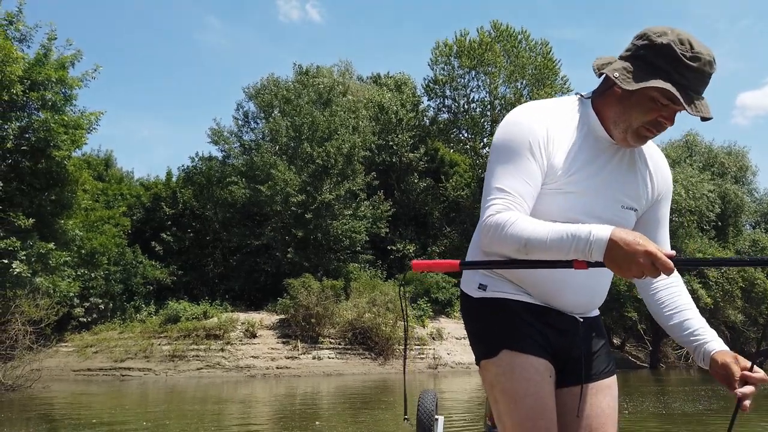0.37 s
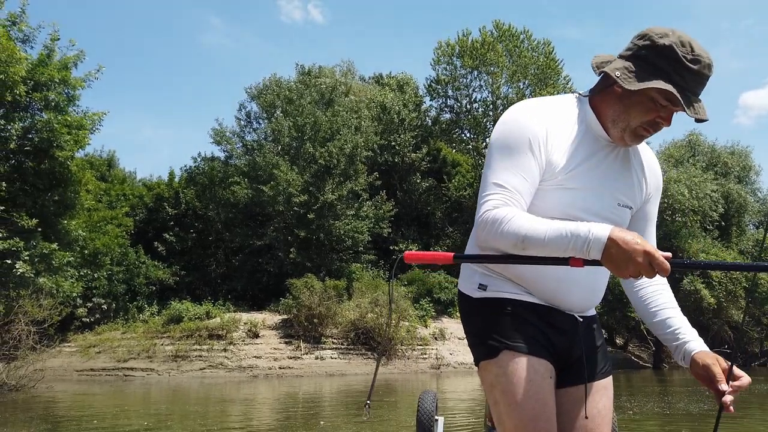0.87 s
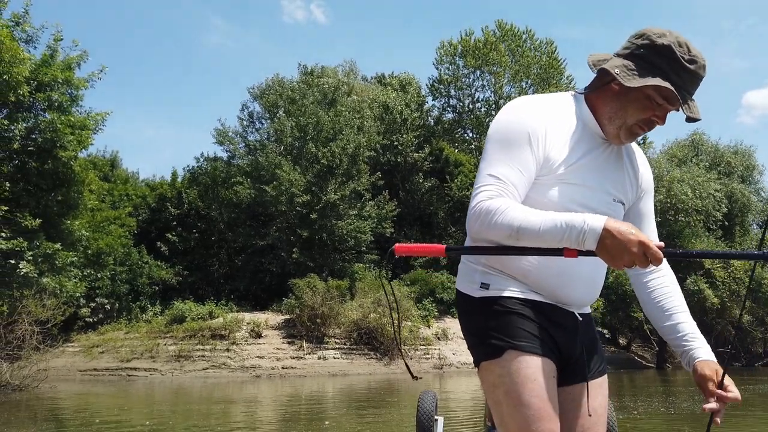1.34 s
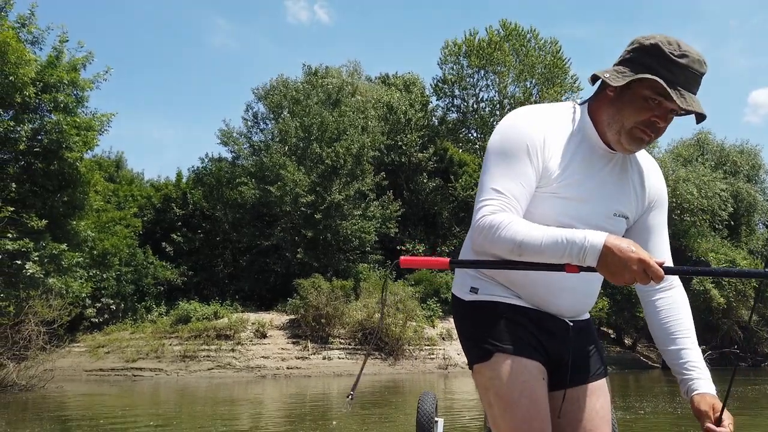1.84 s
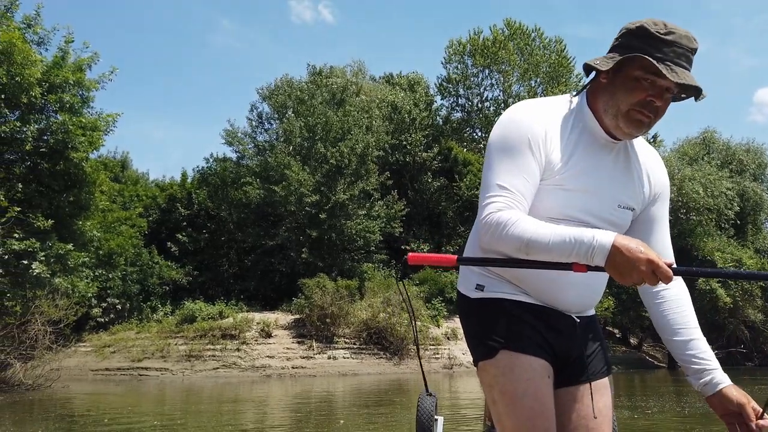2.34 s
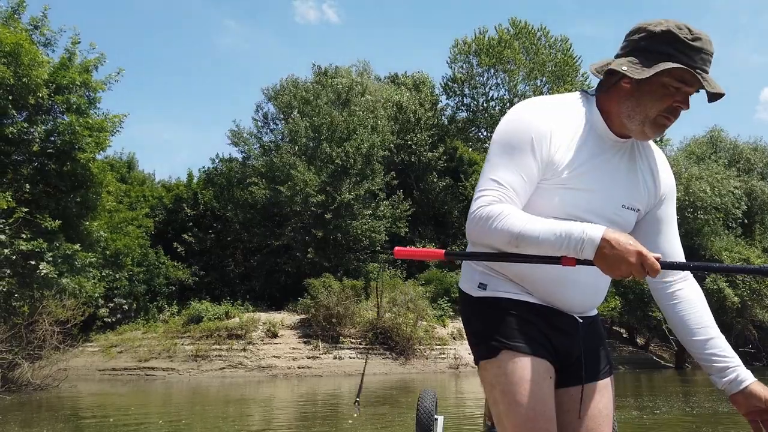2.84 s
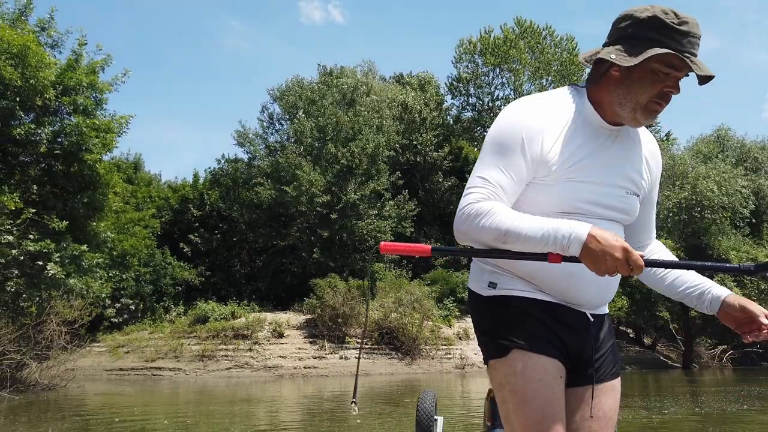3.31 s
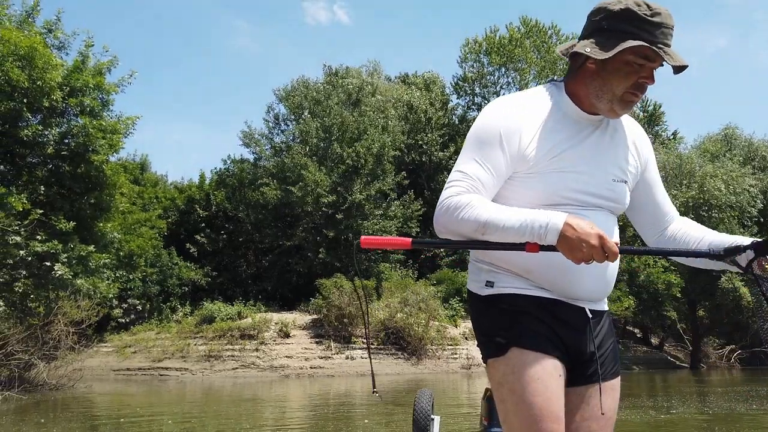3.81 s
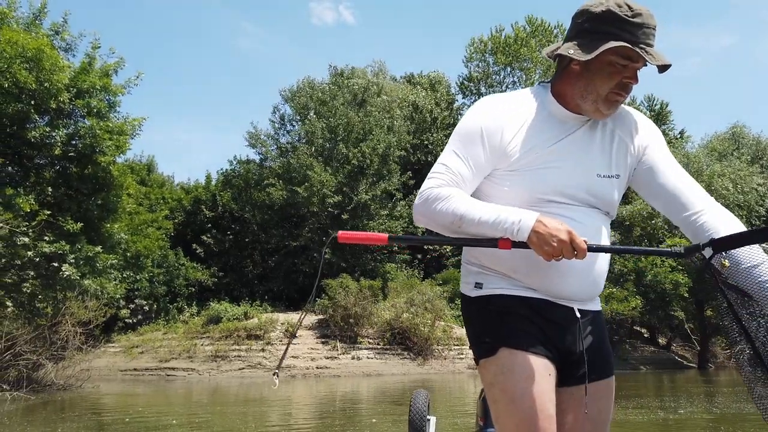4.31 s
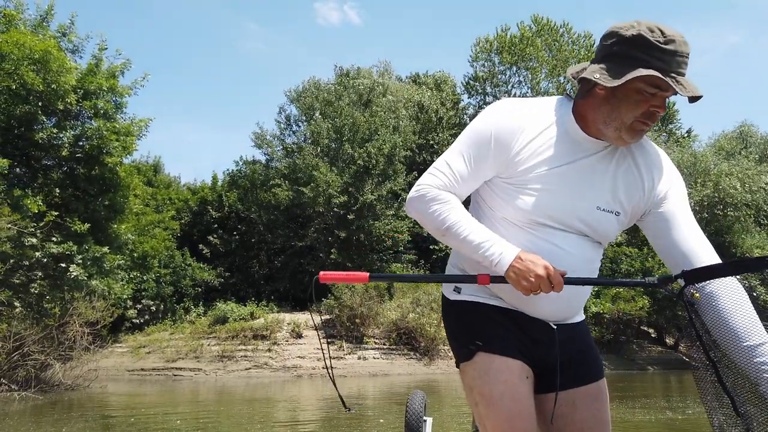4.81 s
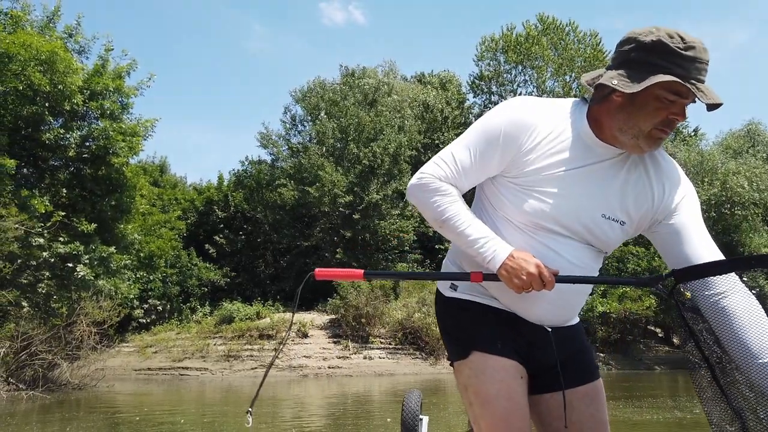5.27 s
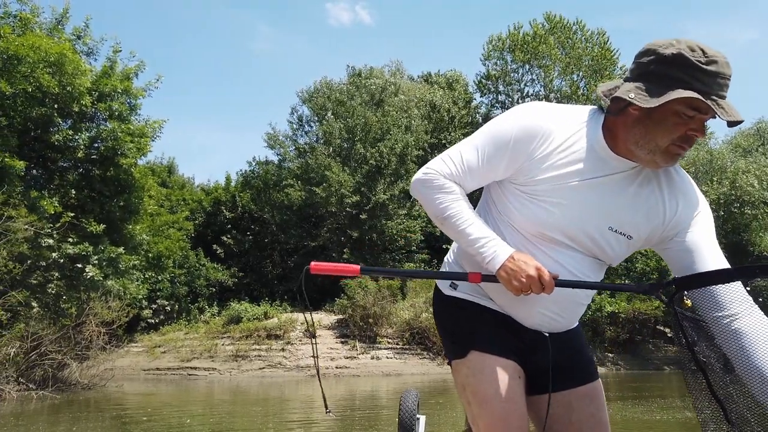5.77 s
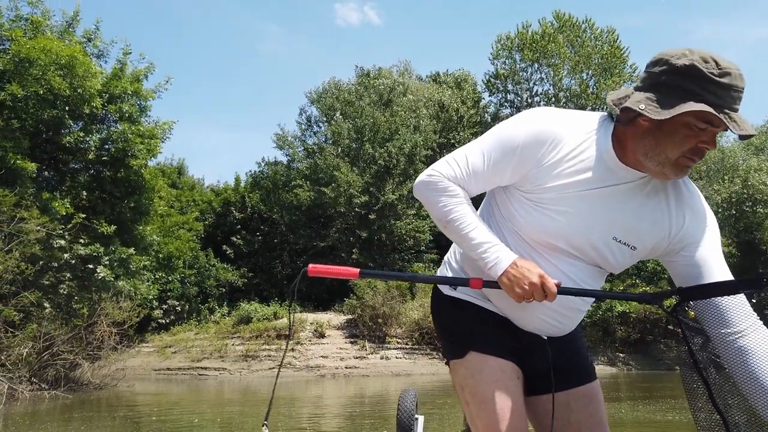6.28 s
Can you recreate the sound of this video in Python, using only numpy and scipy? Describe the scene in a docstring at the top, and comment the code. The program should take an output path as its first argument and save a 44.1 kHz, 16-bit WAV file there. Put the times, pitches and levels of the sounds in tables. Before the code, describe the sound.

Close to the microphone, gear is shifted in a small boat: low, boomy thumps, hollow knocks, ticks and small scrapes come in clusters, with a faint wet net rustle. Far birds chirp dimly behind a very quiet river hush. The handling then eases, and a finch on the wooded bank sings growing paired notes, a quick trill and a tumbling flourish, echoing softly among trees. One low bump interrupts before the song ends.

```python
"""A faint river hush and the rustle of a net in a small boat, soon joined by dull thumps and knocks of shifted gear.
Blows reach the microphone through the hull as low cycles and ringing panels; a loose fitting ticks and scrapes.
Weight shifts and dragged gear are slow swells of low noise; net and hush are shaped, patchy stereo noise.
Far birds call as gliding sines, mostly echo; on the wooded bank a finch sings growing pairs, a trill and a
falling flourish, its gliding, buzzing sines scattered by the trees."""
import sys
import numpy as np
from scipy import signal
from scipy.fft import rfft, irfft, next_fast_len
from scipy.io import wavfile
from scipy.ndimage import uniform_filter1d, map_coordinates

SR = 44100
rng = np.random.default_rng(int(sys.argv[2]) if len(sys.argv) > 2 else 0)


def generate_wav(sig):
    """Save sig (samples, or channels by samples) to the path in sys.argv[1] as 16-bit PCM at SR."""
    pcm = np.round(np.clip(np.atleast_2d(sig).T, -1, 1) * 32767).astype(np.int16)
    wavfile.write(sys.argv[1], SR, pcm)


def gain_from_db(level_db):
    """Turn a decibel level (scalar or array-like) into a linear amplitude factor."""
    decades = np.asarray(level_db, float) / 20
    return 10 ** decades


N = 292846  # samples in the scene


def unit(x):
    """Scaled to rms 1."""
    return x / np.sqrt(np.mean(x ** 2) + 1e-20)


def along(points, hz):
    """Values of (Hz, value) points, joined on a log frequency axis."""
    f, v = np.transpose(points)
    return np.interp(np.log(hz + 1), np.log(f + 1), v)


def curves(rows):
    """One value per sample for each column after the time."""
    s, *cols = np.transpose(rows)
    return [np.interp(np.arange(N) / SR, s, c) for c in cols]


def wobble(rate):
    """A smooth random curve, rate knots a second, 400 at most."""
    knots = rng.standard_normal(N // 100)
    return map_coordinates(knots, [np.arange(N) * min(rate, 400) / SR])


def filtered(x, response):
    """x times a complex response of frequency."""
    m = next_fast_len(N + SR // 2)
    return irfft(rfft(x, m) * response(np.fft.rfftfreq(m, 1 / SR)), m)[..., :N]


def ringing(x, modes):
    """x through parallel (Hz, width Hz, dB) resonances of alternating sign."""
    def response(f):
        return sum((-1) ** k * gain_from_db(db) * 1j * f * width / (hz * hz - f * f + 1j * f * width)
                   for k, (hz, width, db) in enumerate(modes))
    return filtered(x, response)


def rush(spectrum, alike, patchy_db=0):
    """Stereo noise of rms 1 with patches of random gain; alike sets the left-right likeness by frequency."""
    z = signal.stft(rng.standard_normal((2, N)), nperseg=512)[2]
    field = uniform_filter1d(rng.standard_normal(z.shape[1:]), size=3, axis=0)
    field = uniform_filter1d(field, size=8, axis=1)
    pair = signal.istft(z * gain_from_db(patchy_db * unit(field)), nperseg=512)[1][:, :N]

    def response(hz):
        turn = np.arccos(np.clip(along(alike, hz), -1, 1)) / 2
        return gain_from_db(along(spectrum, hz)) * [np.cos(turn), np.sin(turn)]
    mid, side = filtered(pair, response)
    return unit(np.array([mid + side, mid - side]))


def add(track, s, sound):
    """Mixes a sound into the track at time s."""
    track[round(s * SR):][:len(sound)] += sound


def swell(t, time):
    """Rises to 1 at the given time, 1 ms at the least, and dies away."""
    u = t / max(time, .001)
    return u * np.exp(1 - u)


def river_hush():
    """River and leaves: steady, faintly patchy noise that slowly sinks."""
    # hush level before its slow wander: (time [s], level [dB])
    hush_level = [(0, -72), (2.5, -73), (4.5, -73.5), (6.64, -76.5)]
    # hush spectrum: (frequency [Hz], relative density [dB per Hz])
    hush_spectrum = [(100, -20), (150, -6), (220, -18), (400, -21), (1000, -25), (1800, -24), (2900, -22),
                     (4500, -27), (6000, -34), (8000, -37), (12700, -39), (12900, -62)]
    # how alike both microphone ports hear it: (frequency [Hz], left-right likeness [0..1])
    likeness = [(60, 0.75), (180, 0.81), (550, 0.32), (1650, 0.12), (4970, 0.12), (15000, 0.17)]
    level_db, = curves(hush_level)
    return gain_from_db(level_db + 0.6 * wobble(2.86)) * rush(hush_spectrum, likeness, patchy_db=2.3)


def handling():
    """Weight shifts sway the boat and gear drags over its floor in lumps."""
    # how hard weight and gear are shifted, before lumps: (time [s], drag level [dB])
    effort = [(0, -60), (.45, -64), (.7, -47), (.87, -58), (1.15, -69.5), (1.4, -63), (1.9, -68),
              (2.1, -45), (2.35, -51), (2.7, -59.5), (2.85, -72), (3.2, -74.5), (3.45, -45), (3.82, -75),
              (4.8, -78), (4.9, -55.5), (5.05, -77.5), (6.64, -75)]
    # swaying boat: (frequency [Hz], relative density [dB per Hz])
    sway_spectrum = [(20, 3.5), (50, 6.5), (95, 0), (150, -50), (300, -120)]
    # dragged gear: (frequency [Hz], relative density [dB per Hz])
    drag_spectrum = [(50, -28.5), (80, 3.5), (170, -3), (300, -24.5), (900, -40), (2000, -120)]
    drag_db, = curves(effort)
    # mean sway -61.5 dB before its wander; it follows the drag by 0.53 dB per dB
    sway_db = -61.5 + 0.53 * (drag_db - drag_db.mean())
    sway = gain_from_db(sway_db + 2.2 * wobble(7.2)) * rush(sway_spectrum, [(50, 0.95)])
    drag = gain_from_db(drag_db + 2.2 * wobble(12)) * rush(drag_spectrum, [(150, 1.0)], patchy_db=1.0)
    return sway + drag


def net():
    """Wet mesh slides in strokes that start fast and fade, crackling unevenly."""
    # strokes of the net before the crackle: (time [s], length [s], rustle level [dB])
    strokes = [(0, 0.053, -74.5), (0.176, 0.28, -77.5), (0.341, 0.16, -70), (0.552, 0.2, -86),
               (1.045, 0.14, -85), (1.253, 0.26, -83.5), (2.05, 0.31, -73.5), (3.443, 0.19, -82),
               (4.718, 0.59, -80)]
    # rustling mesh: (frequency [Hz], relative density [dB per Hz])
    mesh_spectrum = [(4000, -25), (6500, -12), (9000, -4), (11500, 0), (15600, -5), (15750, -60)]
    stroke = np.zeros(N + SR)
    for s, length, db in strokes:
        u = np.linspace(0, 1, round(length * SR))
        add(stroke, s, gain_from_db(db) * np.sin(np.pi * u ** 0.5))
    swish = rush(mesh_spectrum, [(10000, .15)], patchy_db=4)
    return stroke[:N] * gain_from_db(2.4 * wobble(30)) * swish


def hull():
    """A soft blow rocks the hull for a few low cycles; its edge rings the panels, the high ones more if it is hard."""
    # blows on the hull: (time [s], thump envelope peak [dB], thump pitch [Hz], knock peak [dB], swell time [s])
    blows = [(0.244, -45, 152.6, -45.5, 0.018), (0.266, -45.5, 147.4, -74, 0.028),
             (0.352, -62, 132, -47.5, 0.012), (0.438, -46, 198, -39.5, 0.016),
             (0.519, -37.5, 188, -38.5, 0.012), (0.531, -28.5, 146, -65, 0.006),
             (0.555, -37, 99, -65, 0.011), (0.658, -38, 140, -48.5, 0.0054),
             (0.719, -48.5, 185, -60, 0.0065), (0.776, -37, 181.6, -38.5, 0.014),
             (0.81, -33, 78.5, -49, 0.0056), (1.195, -47, 332.5, -42.5, 0.015),
             (1.198, -46, 145, -50, 0.019), (1.299, -53, 152, -51.5, 0.0075),
             (1.32, -49, 185, -44.5, 0.013), (1.355, -48, 76, -51.5, 0.017),
             (1.506, -58.5, 114, -56, 0.018), (1.643, -56.5, 121, -54.5, 0.015),
             (1.693, -50, 150, -61, 0.011), (1.97, -40, 144, -41, 0.011), (2.078, -36.5, 123, -35, 0.012),
             (2.102, -41, 113.8, -51, 0.052), (2.168, -31, 140, -55, 0.0041),
             (2.235, -18.5, 130, -32.5, 0.008), (2.259, -24.5, 173, -69, 0.0037),
             (2.283, -42, 151.4, -42, 0.018), (2.306, -44, 113, -43, 0.012),
             (2.326, -32.5, 67.2, -73, 0.0074), (2.475, -49.5, 127.8, -51.5, 0.021),
             (2.628, -55, 95, -57.5, 0.006), (3.27, -48, 157, -63, 0.012), (3.382, -44, 130, -38, 0.015),
             (3.39, -31.5, 145, -54, 0.012), (3.461, -33, 127, -53, 0.009),
             (3.478, -53.5, 123, -45.5, 0.023), (3.49, -34.5, 122.2, -62, 0.011),
             (3.536, -45, 151, -50.5, 0.004), (3.696, -51, 128.4, -63, 0.02),
             (4.873, -43.5, 88.4, -65, 0.0096), (4.905, -40, 60.4, -60.5, 0.0072),
             (5.157, -72, 85, -59.5, 0.014)]
    # panel modes before each blow's tilt and mix: (frequency [Hz], width [Hz], level [dB])
    panels = [(242, 13.4, 5.5), (320.6, 61, 13.5), (468, 194, 13), (656, 52, -5.5), (802, 53, -1.5),
              (993, 100, -17), (1293, 230, -16)]
    # the more knock over thump, the harder the contact: tilt at equal levels [dB per octave], change per dB
    tilt_db, tilt_per_db = -1.5, 0.96
    mode_vary_db = 3  # each blow lands elsewhere and rings the panels in another mix
    bite_s = 0.015  # blows that swell slower than this are scuffs and lose their sharp edge

    boat, t = np.zeros(N + SR), np.arange(SR // 5) / SR
    lumps = gain_from_db(3 * wobble(90))  # the contact chatters
    mode_hz, width, mode_db = np.transpose(panels)[..., None]
    modes = gain_from_db(mode_db) * np.exp(-np.pi * width * t) * np.sin(2 * np.pi * mode_hz * t)
    for s, db, hz, knock_db, time in blows:
        thump = swell(t, time) ** 1.73 * np.sin(2 * np.pi * hz * t)
        add(boat, s, gain_from_db(db) * thump)

        hard_db = tilt_db + tilt_per_db * (knock_db - db)
        mix_db = hard_db * np.log2(mode_hz / 500) + mode_vary_db * rng.standard_normal(mode_hz.shape)
        ring = np.sum(gain_from_db(mix_db) * modes, axis=0)
        bite = min(bite_s / time, 1) ** 2 * swell(t, 0.0019)
        scuff = 0.5 * swell(t, 1.05 * time) ** 1.46 * lumps[round(s * SR):][:len(t)]
        edge = (bite + scuff) * rng.standard_normal(len(t))
        soft = uniform_filter1d(edge, size=15)  # a yielding contact carries little treble
        knock = signal.fftconvolve(soft, ring)
        add(boat, s, gain_from_db(knock_db) * knock / np.abs(knock).max())
    # the two microphone ports ride the shaking a little apart
    apart = gain_from_db(-33.0) * np.gradient(boat[:N]) * SR / 1000
    return boat[:N] + np.array([apart, -apart])


def fitting():
    """A tick strikes the fitting's modes, shakes them and leaves a grainy rattle; scrapes add a bright rasp."""
    # ticks: (time [s], shake drive [dB], shake time, twice its rise [s], upper modes over main mode's drive [dB],
    # main pitch, which depends on how the fitting rests [Hz])
    ticks = [(0.247, -45, 0.0073, -21, 1950), (0.351, -40.5, 0.011, -31, 1610),
             (0.354, -41, 0.014, -29, 2010), (0.388, -56, 0.012, -20, 1930),
             (0.4432, -27.5, 0.0013, -18, 1970), (0.5226, -42, 0.0028, -21, 1840),
             (0.7845, -29, 0.0037, -2, 1914), (1.197, -49, 0.018, -15, 1900),
             (1.297, -49, 0.0094, -12, 1670), (1.322, -34.5, 0.0024, -10, 1840),
             (1.367, -48.5, 0.011, -18, 1560), (1.6423, -44.5, 0.0041, -21, 1950),
             (2.05, -43, 0.023, 0, 1690), (2.077, -35, 0.019, -22, 1815), (2.094, -48, 0.0079, -6, 1900),
             (2.238, -34, 0.0094, -3.5, 1940), (2.278, -51, 0.015, 3.5, 1890),
             (2.3053, -38, 0.0042, -15, 1910), (3.382, -51, 0.013, -14, 2250),
             (3.421, -52, 0.0063, -8, 1980)]
    # upper mode, passed twice: (frequency [Hz], width [Hz], level of each pass [dB])
    upper_mode = [(2780, 430, -1.3)]
    # bright scrapes, each with a brief ping: (time [s], bite level [dB], bite time [s], ping pitch [Hz])
    scrapes = [(0.351, -71.5, 0.0044, 5900), (1.316, -71.5, 0.0035, 5010), (2.048, -65, 0.0027, 3960),
               (2.0767, -54.5, 0.001, 7400), (2.097, -68, 0.0066, 5280), (2.238, -73, 0.0032, 6700),
               (2.307, -73, 0.002, 4600), (2.433, -72, 0.0015, 4840), (3.602, -68.5, 0.0014, 4080)]
    # rasp of the scrapes: (frequency [Hz], relative density [dB per Hz])
    rasp_spectrum = [(1200, -42), (2500, -8), (4100, -4), (4700, -7.5), (5300, -1), (6300, -17),
                     (11000, -11), (12600, -11), (14000, -46.5)]
    main_width_hz = 254
    rattle_db, rattle_slower = -18, 6.2  # after-rattle under the shake [dB], its time over the shake's
    tail_db, tail_slower = -6.5, 6.7  # scrape tail against the bite [dB], its time over the bite's
    ping_db = 1  # ping over the bite's drive

    low, upper, rasp, ping = np.zeros((4, N + SR))
    t = np.arange(SR // 5) / SR
    grain = gain_from_db(2.3 * wobble(200))
    jolts = np.sign(rng.standard_normal(N))
    short_t = t[:SR // 20]
    decay = np.pi * main_width_hz * short_t
    for s, db, time, upper_db, hz in ticks:
        here = slice(round(s * SR), round(s * SR) + len(t))
        rattle = swell(t, .5 * time * rattle_slower) * grain[here]
        shake = (swell(t, .5 * time) + gain_from_db(rattle_db) * rattle) * jolts[here]
        shake += gain_from_db(23.5) * swell(t * 20, .001) / 6  # first contact, over in a fraction of a millisecond
        mode = 2 * np.pi * main_width_hz / SR * decay * np.exp(-decay) * np.sin(2 * np.pi * hz * short_t)
        add(low, s, gain_from_db(db) * signal.fftconvolve(shake, mode))
        add(upper, s, gain_from_db(db + upper_db) * shake)
    for s, db, time, hz in scrapes:
        bite = swell(t, time)
        tail = gain_from_db(tail_db) * swell(t, time * tail_slower) * grain[round(s * SR):][:len(t)]
        add(rasp, s, gain_from_db(db) * (bite + tail))
        add(ping, s, gain_from_db(db + ping_db) * bite * np.sin(2 * np.pi * hz * t))
    clack = low[:N] + ringing(ringing(upper[:N], upper_mode), upper_mode)
    clack = filtered(clack, lambda hz: 1 / (1 + 1j * hz / 3800) ** 2)  # rounded edges give little above the modes
    scratch = rush(rasp_spectrum, [(3500, .85), (14000, .3)], patchy_db=4)
    return clack + rasp[:N] * scratch + ping[:N]


def whistles(notes):
    """Each note is a sine gliding through three pitches; a fast uneven warble of its pitch makes it buzz."""
    track = np.zeros(N + SR)
    warble = unit(filtered(rng.standard_normal(N + SR), lambda f: (f > 60) & (f < 400)))
    for s, length, start_hz, middle_hz, end_hz, db, buzz_hz in notes:
        u = np.linspace(0, 1, round(length * SR))
        hz = np.polyval(np.polyfit([0, .5, 1], [start_hz, middle_hz, end_hz], deg=2), u)
        hz += buzz_hz * warble[round(s * SR):][:len(u)]
        envelope = np.sin(np.pi * u ** 0.85) ** .7
        add(track, s, gain_from_db(db) * envelope * np.sin(2 * np.pi * np.cumsum(hz) / SR))
    return track[:N]


def trees(x, alike, count=4):
    """Trunks and stirring leaves scatter a call into tails that build up, then die away, slowest at 2.6 to 5.5 kHz."""
    # decay among the trees: (frequency [Hz], time to fall by 60 dB [s])
    decay_times = [(1500, 0.22), (2600, 0.52), (5500, 0.5), (8000, 0.22)]
    flutter, flutter_rate = 2.2, 400  # moving leaves shake what they scatter: depth, knots a second
    hz, t, z = signal.stft(rng.standard_normal((2, count, SR)), SR, nperseg=256)
    fade = gain_from_db(-60 * t / along(decay_times, hz)[:, None])
    a, b = signal.istft(z * fade, SR, nperseg=256)[1]
    build = np.minimum(np.arange(a.shape[1]) / SR / .015, 1)  # over 15 ms
    turn = np.arccos(np.clip(alike, 0, 1)) / 2
    tail = build * (np.cos(turn) * a + np.sin(turn) * np.array([b, -b])) / np.linalg.norm(a[0])
    # forty times a second the next tail takes over, in rotation
    stir = (np.arange(N) / SR * 40 - np.arange(count)[:, None]) % count
    share = np.sin(np.pi / 2 * np.minimum(stir, 2))
    share = share * (1 + flutter * wobble(flutter_rate)) / np.hypot(1, flutter)
    return signal.fftconvolve((x * share)[None], tail, axes=2).sum(axis=1)[:, :N]


def far_birds(buzz_hz=150):
    """Distant calls arrive blurred, mostly as echo."""
    # far calls: (time [s], length [s], start pitch [Hz], end pitch [Hz], level before echo [dB])
    calls = [(0.846, 0.04, 3510, 4660, -68), (0.932, 0.057, 3700, 5080, -71),
             (1.768, 0.035, 3370, 3870, -67), (1.776, 0.026, 4120, 4600, -70.5),
             (2.36, 0.061, 3050, 2750, -74.5), (2.528, 0.048, 2788, 2776, -69),
             (2.653, 0.033, 3210, 2130, -72), (3.015, 0.068, 3840, 3300, -75)]
    voice = whistles([(s, length, a, (a + b) / 2, b, db, buzz_hz) for s, length, a, b, db in calls])
    return voice + gain_from_db(2.5) * trees(voice, alike=0.74)


def finch(top_hz=3450):
    """After another bird's thin note, pairs grow, a syllable repeats louder and slurs deeper, a flourish closes."""
    # another bird's thin note, levels here and below before beak and echo: (time [s], length [s],
    # start pitch [Hz], middle pitch [Hz], end pitch [Hz], level [dB], buzz [Hz rms])
    thin_call = [(.97, .095, 6520, 6550, 6450, -62.5, 54)]
    # one opening pair, a falling chip and a thin held note: (time from the chip [s], length [s],
    # start pitch [Hz], middle pitch [Hz], end pitch [Hz], level within the pair [dB], buzz [Hz rms])
    pair = [(0, 0.0442, 5090, 4450, 4380, -3.5, 134), (0.037, 0.037, 6400, 6380, 6410, -2.5, 55)]
    # one syllable, two soft chips and a down-slur in two parts, loud at its head: (time from the slur [s], length [s],
    # full-depth start, middle and end pitch [Hz], level within the syllable [dB], buzz [Hz rms])
    syllable = [(-.021, 0.023, 5040, 4620, 4150, -16, 303), (-.011, 0.0039, 3860, 3299, 3120, -10.5, 150),
                (-.002, 0.011, 3440, 3449, 3210, -4.5, 40), (.004, 0.0204, 3400, 2850, 2230, -6, 80)]
    # clear slurs of the closing flourish: (time [s], length [s], start pitch [Hz], middle pitch [Hz],
    # end pitch [Hz], level [dB])
    flourish = [(5.21, 0.03, 2395, 3094, 3800, -49.5), (5.237, 0.03, 3990, 3940, 3950, -57),
                (5.251, 0.027, 3460, 2770, 2610, -51), (5.271, 0.042, 2540, 2263, 2000, -50.5),
                (5.312, 0.025, 1900, 1730, 1570, -48.5), (5.407, 0.022, 4900, 5040, 4860, -61.5),
                (5.485, .052, 3563, 2876, 2500, -47.5), (5.531, 0.064, 2604, 2345, 2020, -51),
                (5.589, 0.032, 1950, 1740, 1530, -49)]
    # its wheezy notes: (time [s], length [s], start pitch [Hz], end pitch [Hz], level [dB])
    wheezes = [(5.409, 0.074, 5900, 5200, -63.5), (5.45, 0.072, 4900, 3500, -60.5),
               (5.697, 0.042, 5560, 3800, -73.5)]
    # the beak's resonance: (frequency [Hz], width [Hz], level [dB])
    beak = [(3300, 930, 0.5)]
    clear_buzz_hz, wheeze_buzz_hz = 35.7, 250
    vary_pitch, vary_db, vary_s = .01, 1, .0005  # no two notes of the trill are alike

    notes = list(thin_call)
    for k in range(4):
        start, gain_db = 3.801 + k * .1425, -75.5 + k * 6
        notes += [(start + lag, length, *hz, db + gain_db, buzz_hz)
                  for lag, length, *hz, db, buzz_hz in pair]
    for k in range(10):
        start, gain_db = 4.3588 + k * .0867, -51 + 3 * np.sqrt(k)
        depth = min(0.65 + k * 0.093, 1)  # share of the full slur below top_hz
        for lag, length, *hz, db, buzz_hz in syllable:
            pitch, level = rng.standard_normal(2)
            slur = np.array([top_hz + (f - top_hz) * depth if f < top_hz else f for f in hz])
            slur = (1 + vary_pitch * pitch) * slur
            note_db = db + vary_db * level + gain_db
            notes.append((start + lag + vary_s * level, length, *slur, note_db, buzz_hz))
    notes += [(*note, clear_buzz_hz) for note in flourish]
    notes += [(s, length, a, (a + b) / 2, b, db, wheeze_buzz_hz) for s, length, a, b, db in wheezes]
    voice = ringing(whistles(notes), beak)  # the open beak favours the middle of the range
    return voice + gain_from_db(-3.0) * trees(voice, alike=0.52)


def scene():
    """Boat, birds and the hush of river and leaves."""
    boat = handling() + net() + hull() + fitting()
    birds = far_birds() + finch()
    return river_hush() + boat + birds


def band_limit(x):
    """A steep low-pass at the top of the band."""
    return signal.sosfilt(signal.butter(12, 15710, fs=SR, output="sos"), x)


def record(dry):
    """The finished stereo mix as the camera in the boat keeps it."""
    return band_limit(dry)


dry = scene()
out = record(dry)
generate_wav(out)
```